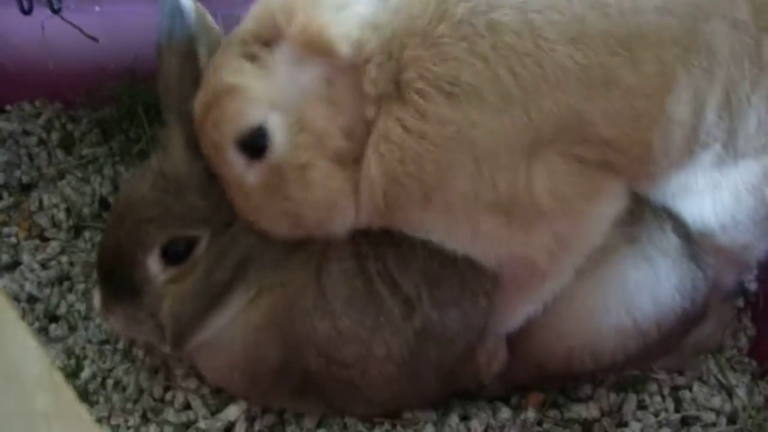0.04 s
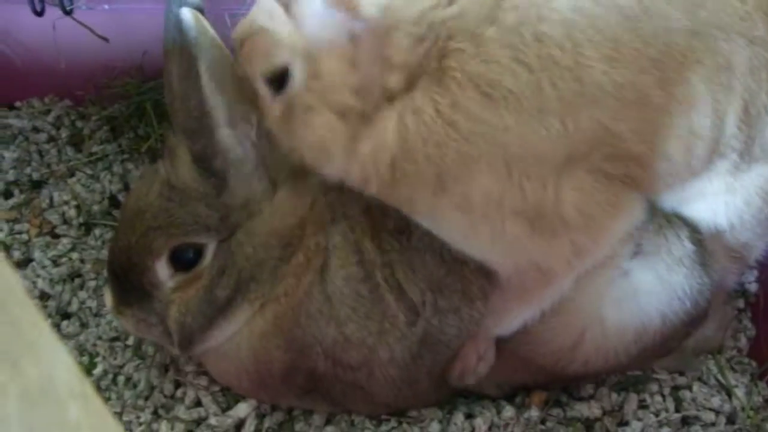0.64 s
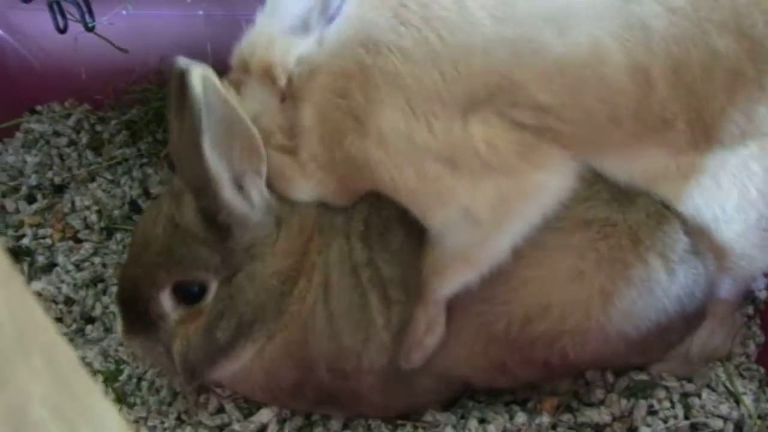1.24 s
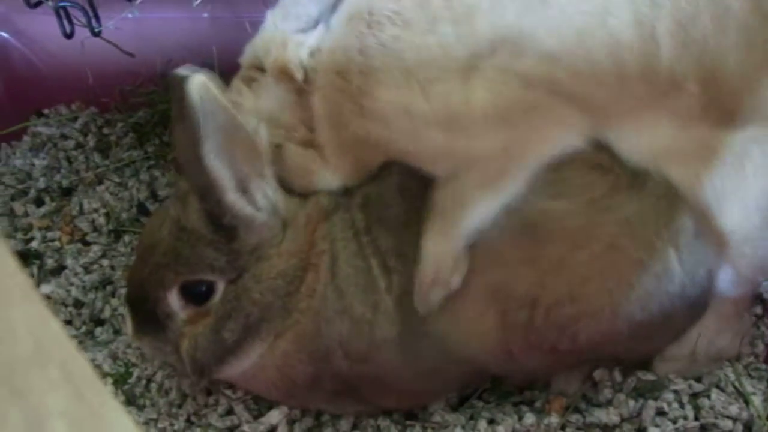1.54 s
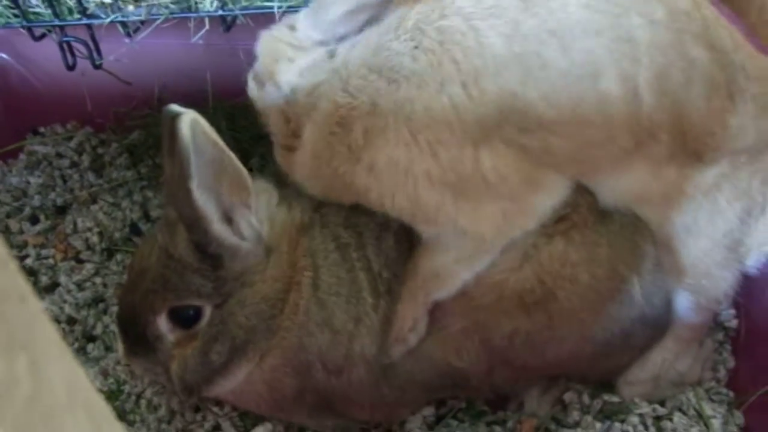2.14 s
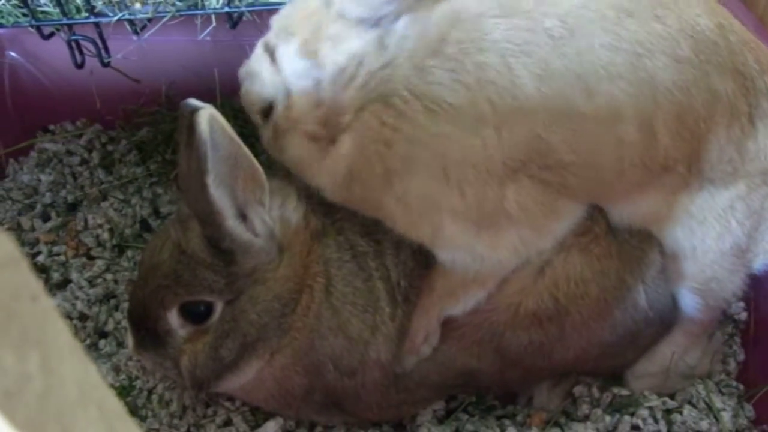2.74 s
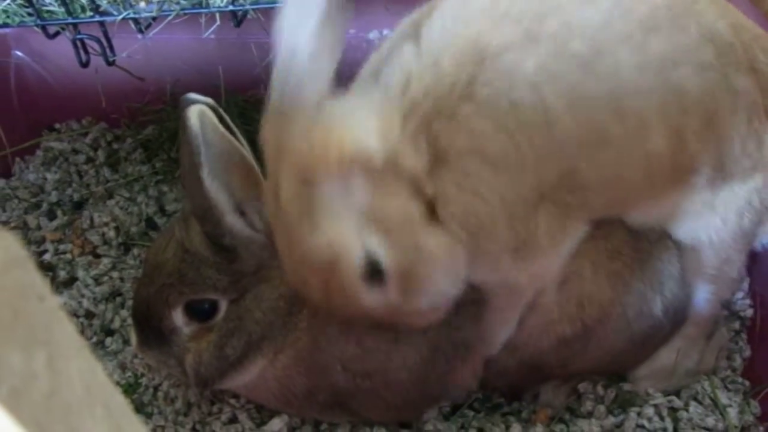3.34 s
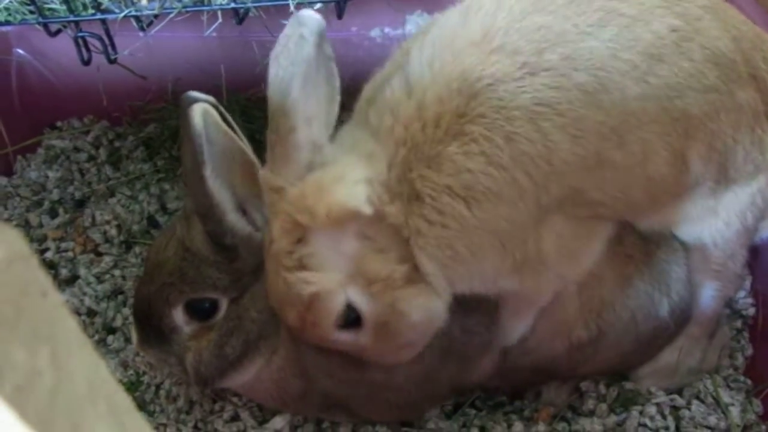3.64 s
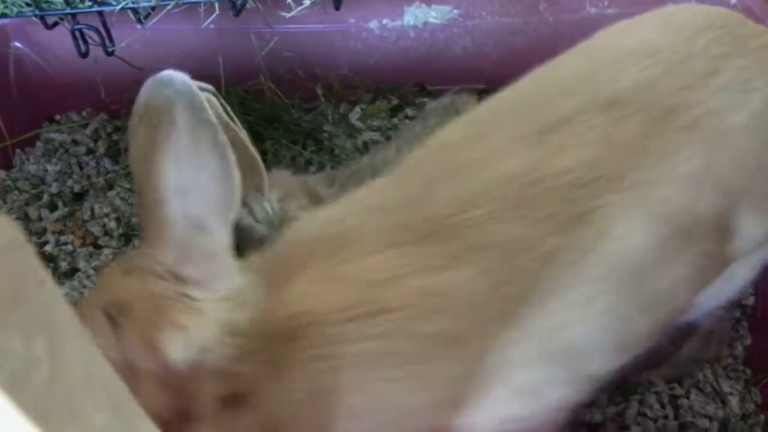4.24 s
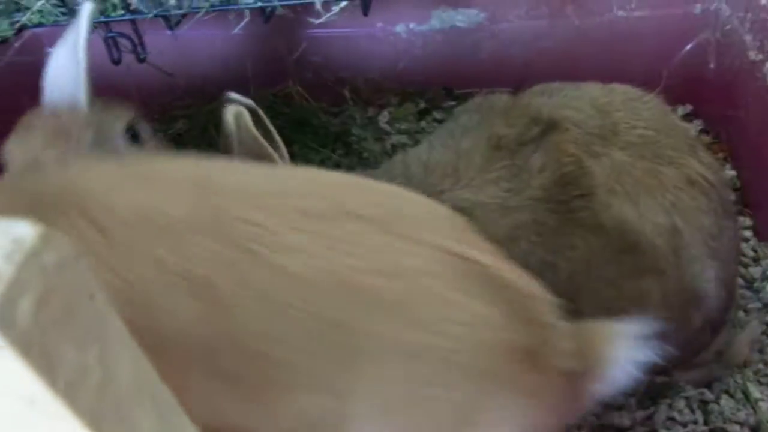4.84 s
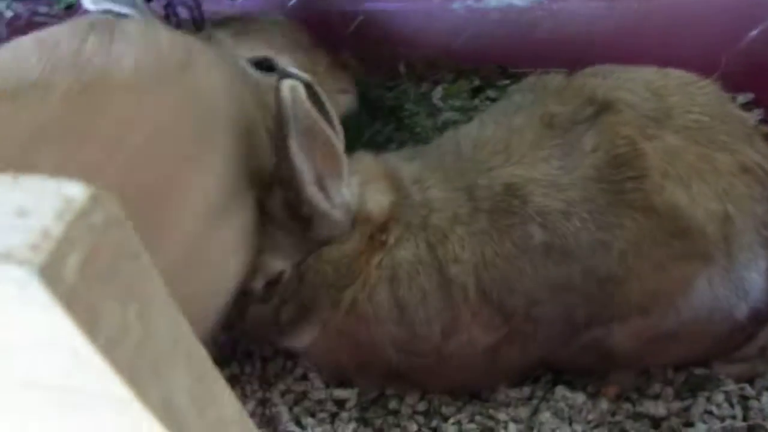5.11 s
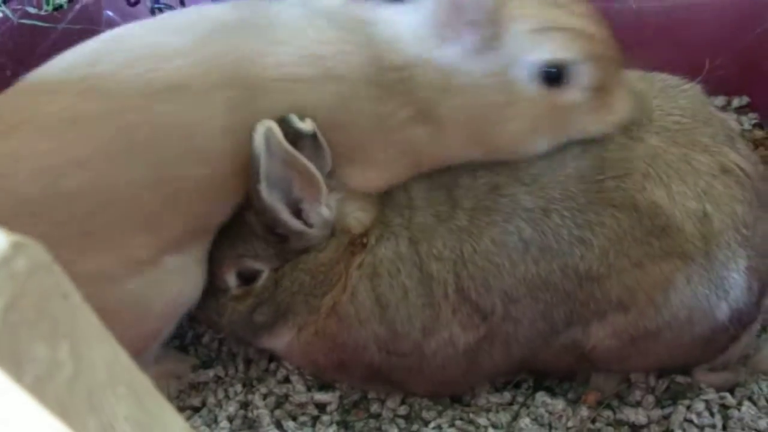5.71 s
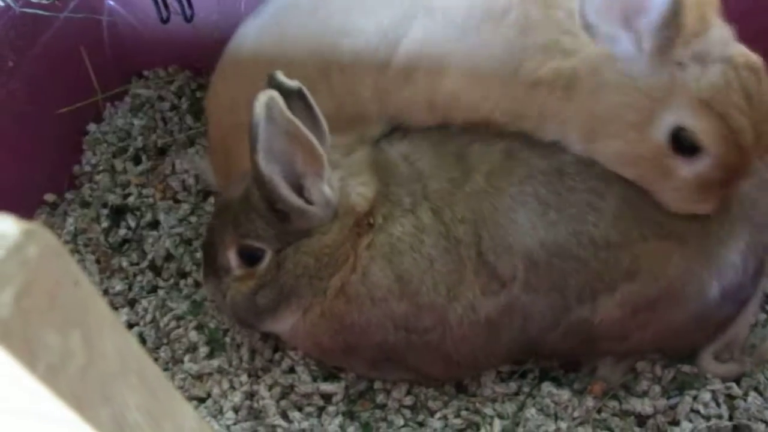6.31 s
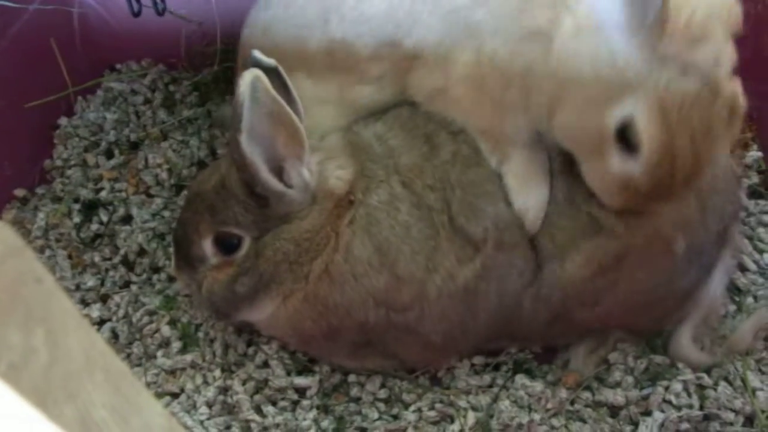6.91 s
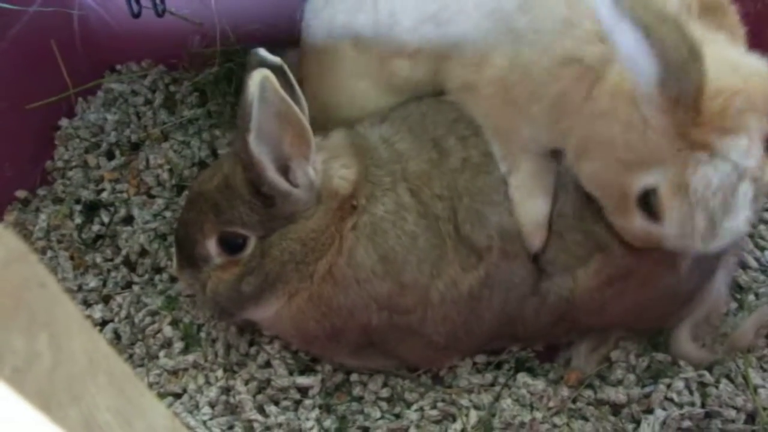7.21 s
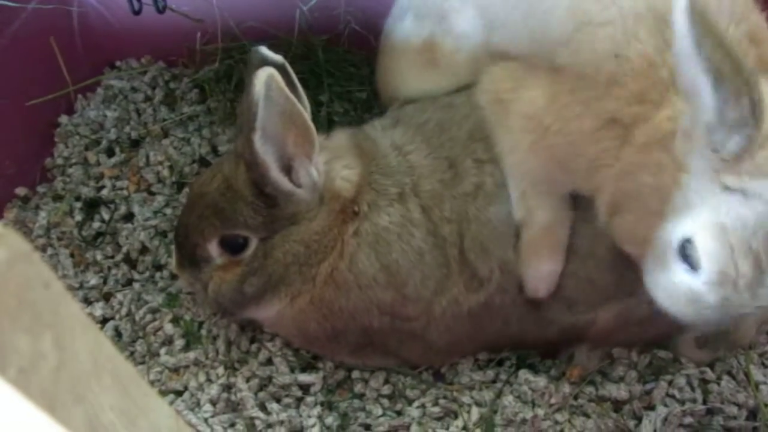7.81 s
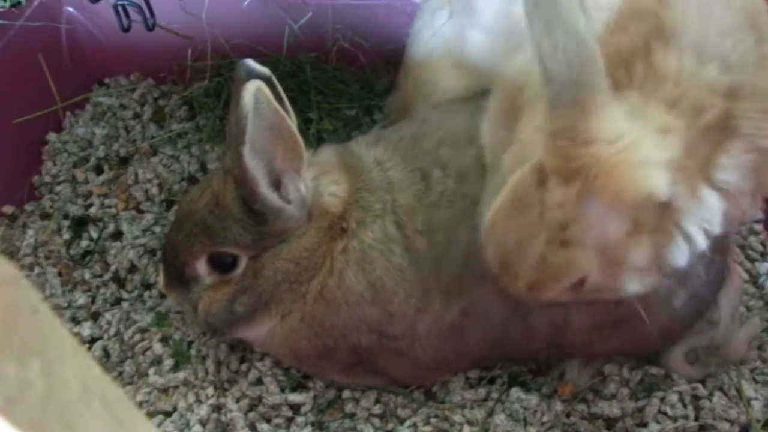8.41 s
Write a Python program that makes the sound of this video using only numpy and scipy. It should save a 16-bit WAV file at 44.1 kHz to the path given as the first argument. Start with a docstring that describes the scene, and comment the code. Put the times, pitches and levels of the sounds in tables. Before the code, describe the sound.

Two rabbits scuffle quietly in a plastic cage tray of pellet litter, close to the microphone. Faint room noise, a low hum and a thin electronic whine run throughout. At about 0.9 seconds the tray knocks against something hard. From 1.3 to 1.6 seconds a quick flurry of soft, hollow thumps makes its floor ring briefly. A lull follows, broken by a second knock at 3 seconds. From 3.9 seconds light, uneven paw steps crunch through the pellets, with hissy fur brushes and a soft rumble of shifting weight. Something small snaps sharply at 5.1 seconds. Claws and loose pellets click in a cluster around 5.9 seconds, followed by a firmer thump just after 6. Fur rustles in short swells from 6.4 to 7.7 seconds, with gentle thumps and crunches near 7.1 and 7.4. Then only the room remains until about 8.5 seconds.

```python
"""Two rabbits scuffle in pellet litter in a plastic cage tray, in a quiet room, near a mono microphone. Their
weight thumps the tray floor and rings its modes. Pellets crunch under paws and fur brushes over fur and litter,
both as trains of tiny slips. Pellets click, the tray knocks twice against something hard, and once something
snaps sharply close by. Under it lie room noise, a faint mains hum and a thin electronic whine."""
import sys
import numpy as np
from scipy import signal
from scipy.fft import rfft, irfft
from scipy.io import wavfile
from scipy.ndimage import uniform_filter1d

SR = 44100
rng = np.random.default_rng(int(sys.argv[2]) if len(sys.argv) > 2 else 0)


def transcribe(signal):
    """Save signal, clipped to [-1, 1], as a 16-bit WAV file at the path in sys.argv[1]."""
    frames = np.atleast_2d(signal).T
    limited = np.clip(frames, -1, 1)
    pcm = np.round(limited * 32767).astype(np.int16)
    wavfile.write(sys.argv[1], SR, pcm)


N = 377496


def amp(db):
    return 10 ** (np.asarray(db) / 20)


def unit_rms(x):
    return x / np.sqrt(np.mean(x ** 2) + 1e-20)


def seconds(count):
    return np.arange(count) / SR


def curve_at(points, hz):
    """Interpolates (Hz, value) points on a log-frequency axis."""
    point_hz, value = np.transpose(points)
    return np.interp(np.log(hz + 1), np.log(point_hz + 1), value)


def add(mix, start_s, sound):
    part = mix[round(start_s * SR):][:len(sound)]
    part += sound[:len(part)]


def colour(x, spectrum):
    """Filters x by (Hz, dB) points; rms 1."""
    gain = amp(curve_at(spectrum, np.fft.rfftfreq(len(x), 1 / SR)))
    return unit_rms(irfft(rfft(x) * gain, len(x)))


def minimum_phase(gain_db, size=2048):
    """Impulse response for a gain curve; energy 1."""
    log_gain = np.log(amp(np.r_[gain_db, gain_db[-2:0:-1]]))
    response = np.fft.ifft(np.exp(np.conj(signal.hilbert(log_gain)))).real[:size]
    return response / np.linalg.norm(response)


def resonance(hz, centre_hz, width_hz):
    return 1 / (1 + (2 * (hz - centre_hz) / width_hz) ** 2)


def ring(modes, t):
    return sum(amp(db - 60 * t / t60) * np.sin(2 * np.pi * hz * t) for hz, db, t60 in modes)


def slip_train(count, per_s, spread_db):
    """Random impulses of uneven size; rms 1."""
    sizes = amp(spread_db * np.minimum(rng.exponential(1, count), 4)) * rng.choice([-1, 1], count)
    return unit_rms(sizes * (rng.random(count) < per_s / SR))


def smooth_noise(first_samples, second_samples):
    """Twice-averaged noise; rms 1."""
    averaged = uniform_filter1d(rng.standard_normal(N), first_samples)
    return unit_rms(uniform_filter1d(averaged, second_samples))


# Noise floor spectrum. Each row: frequency in Hz, relative level in dB.
NOISE_SPECTRUM = [(12, -54), (20, -10), (122, -2), (153, -2), (176, -5.5), (343, -7), (405, -9), (521, -9),
                  (651, -10), (885, -11.5), (1110, -13.5), (1930, -15), (2770, -17.5), (11800, -20),
                  (15600, -22)]
# Hum, then two whine tones. Each row: frequency in Hz, nominal rms level in dB.
HUM_AND_WHINE = [(149.8, -68), (11600.6, -75), (15526.7, -81)]
def background(noise_db=-55.5, waver_db=2):
    """Steady room noise and microphone hiss, wavering mains hum, steady electronic whine."""
    t = seconds(N)
    hum, *whine = [np.sqrt(2) * amp(db) * np.sin(2 * np.pi * (hz * t + rng.random()))
                   for hz, db in HUM_AND_WHINE]
    hum *= amp(waver_db * smooth_noise(6000, 4000))
    noise = amp(noise_db) * colour(rng.standard_normal(N), NOISE_SPECTRUM)
    return noise + hum + sum(whine)


# Tray wall resonances. Each row: centre in Hz, width in Hz, boost in dB.
WALL_RESONANCES = [(540, 127, 9), (925, 290, 4.5), (1370, 93, 5), (2310, 290, 2.5)]
def through_wall_db(spectrum, hz):
    """A contact spectrum plus the resonances of the plastic wall."""
    wall_db = sum(db * resonance(hz, centre, width) for centre, width, db in WALL_RESONANCES)
    return curve_at(spectrum, hz) + wall_db


def contacts(rows, spectrum, slips_per_s, spread_db, attack_power, spot_db, spot_width_ratio):
    """Each contact sets off a swell of slips in the tray; each spot favours its own pitch."""
    out, t, hz = np.zeros(N), seconds(8192), np.fft.rfftfreq(4096, 1 / SR)
    body_db = through_wall_db(spectrum, hz)
    octaves = np.log2(np.maximum(hz, 500) / 500)
    for start_s, db, decay_s, db_per_octave, spot_hz, *_ in rows:
        press = (t / decay_s) ** attack_power * np.exp(-t / decay_s)
        slips = slip_train(len(t), slips_per_s, spread_db) * press
        slips *= np.linalg.norm(press) / (np.linalg.norm(slips) * press.max())
        spot = resonance(hz, spot_hz, spot_width_ratio * spot_hz)
        response = minimum_phase(body_db + db_per_octave * octaves + spot_db * spot)
        add(out, start_s, amp(db) * signal.fftconvolve(slips, response))
    return out


# Tray knocks. Each row: start in seconds, level in dB, decay in seconds, treble slope in dB/octave,
# spot pitch in Hz, delay until the tray drops back in seconds.
TRAY_KNOCKS = [(0.935, -37, 0.0031, -1, 566, 0.0486), (2.9853, -35.5, 0.0029, 0, 820, 0.049)]
# Hard contact spectrum. Each row: frequency in Hz, relative level in dB.
KNOCK_SPECTRUM = [(150, 3), (350, 2), (550, -6.5), (900, -8.5), (1500, -1), (2100, -3), (2700, -2),
                  (4000, -7), (6500, -15), (10000, -10.5), (15500, -24)]
def knocks():
    """The tray hits something hard: a short, dense burst of slips."""
    return contacts(TRAY_KNOCKS, KNOCK_SPECTRUM, slips_per_s=13000, spread_db=6.5,
                    attack_power=0.54, spot_db=8.5, spot_width_ratio=0.37)


# Weight landing on the tray. Each row: centre time in seconds, relative level in dB,
# push pitch in Hz, coupling through the litter to the floor in dB.
BODY_LANDINGS = [(1.349, -30.5, 89.5, -4), (1.358, -27.5, 167, -11), (1.393, -26.5, 187, -0.5),
                 (1.429, -37, 210, 0), (1.462, -34.5, 205, 1.5), (1.497, -38.5, 100.6, 4),
                 (1.538, -28.5, 190, -2), (1.606, -33.5, 200, 4), (4.636, -40, 219, 0),
                 (5.132, -43, 188.5, 0), (6.056, -24.5, 216, -11), (7.125, -41, 150.4, -4.5),
                 (7.413, -40, 152.5, -2.5)]
def landings(rock_db=-36.5, tilt_lag_s=0.0114, tilt_hz=100, drop_hz=131):
    """Rows for all pushes on the floor: the rabbits, plus the tray's tilt and drop after each knock."""
    tilts = [(s + tilt_lag_s, rock_db, tilt_hz, 0) for s, *_ in TRAY_KNOCKS]
    drops = [(s + drop_s, rock_db, drop_hz, 0) for s, *_, drop_s in TRAY_KNOCKS]
    return BODY_LANDINGS + tilts + drops


# Tray floor modes. Each row: frequency in Hz, relative level in dB, T60 in seconds.
FLOOR_MODES = [(49.8, -9, 0.29), (96.4, -10.5, 0.35), (118, -21, .2), (145, -11, 0.16), (174, -20, 0.19),
               (205, -7.5, 0.13), (233, -3.5, 0.13), (313, -9, 0.089), (400, -10, 0.17), (524, -14, .2)]
def thumps(ring_db=10, push_width_rad=2.95, rebound_s=0.00985, rebound_db=-11.5, band_hz=(30, 500)):
    """Each landing pushes the floor down and back and bounces once; the floor rings on."""
    pushes, drive, t = np.zeros(N), np.zeros(N), seconds(2048)
    middle_s = t.mean()
    for s, db, hz, coupling_db in landings():
        phase = 2 * np.pi * hz * (t - middle_s)
        push = amp(db) * np.sin(phase) * np.exp(-(phase / push_width_rad) ** 2)
        for delay_s, gain in ((0, 1), (rebound_s, amp(rebound_db))):
            add(pushes, s + delay_s - middle_s, gain * push)
            add(drive, s + delay_s - middle_s, gain * amp(coupling_db) * push)
    floor = ring(FLOOR_MODES, seconds(24000))
    floor /= abs(rfft(floor)).max()
    motion = pushes + amp(ring_db) * signal.oaconvolve(drive, floor)[:N]
    # The small tray radiates little deep bass; the litter cushions the top.
    return signal.sosfilt(signal.butter(1, band_hz, "bandpass", fs=SR, output="sos"), motion)


def crushes(lead_s=0.005, share_db=-20, decay_s=0.0093, db_per_octave=-6, spot_hz=370):
    """Contact rows: each landing crushes pellets, a dull crunch in proportion to its weight."""
    return [(s - lead_s, db + share_db, decay_s, db_per_octave, spot_hz) for s, db, *_ in landings()]


# Paws on pellets. Each row: start in seconds, level in dB, decay in seconds,
# treble slope in dB/octave, spot pitch in Hz.
PAW_STEPS = [(1.492, -47, 0.0093, -0.5, 1450), (3.9113, -45.5, 0.0031, 2.5, 1140),
             (4.009, -39.5, 0.0077, -2, 584), (4.617, -38.5, 0.011, -1, 886), (4.920, -41, 0.0074, 0, 590),
             (4.942, -45.5, 0.0078, 2.5, 2400), (5.675, -50.5, 0.026, 3.5, 695),
             (5.87, -49, 0.017, 9.5, 1720), (6.047, -40, 0.0093, 2.5, 1000), (6.589, -53, 0.023, 0.5, 980),
             (7.009, -49.5, 0.012, 0, 990), (7.098, -52, 0.011, -3, 970), (7.367, -42.5, .012, -1.5, 1300),
             (7.383, -45, 0.019, -10, 404)]
# Pellet crunch spectrum. Each row: frequency in Hz, relative level in dB.
PELLET_SPECTRUM = [(90, -29), (200, 2.5), (500, 1.5), (1000, -5), (2200, -6.5), (4000, -13), (6500, -20.5),
                   (10000, -19), (15500, -34)]
def crunches():
    """Paws and landings press pellets against the plastic."""
    return contacts(PAW_STEPS + crushes() + walk(), PELLET_SPECTRUM, slips_per_s=9000, spread_db=2.5,
                    attack_power=0.42, spot_db=10.5, spot_width_ratio=0.18)


# Fur strokes. Each row: fastest moment in seconds, relative level in dB, half length in seconds.
FUR_STROKES = [(3.993, -57.5, .045), (4.75, -57, .03), (4.939, -50.5, 0.014), (5.166, -60, 0.04),
               (5.39, -60, 0.03), (5.686, -62.5, 0.057), (5.865, -58, .04), (5.939, -48, 0.009),
               (6.059, -45.5, 0.012), (6.44, -57.5, .035), (6.659, -49.5, 0.033), (7.073, -54.5, .055),
               (7.104, -46.5, 0.009), (7.304, -55.5, .035), (7.382, -52.5, 0.034), (7.667, -60, .042)]
def slide_speed(rest_db=-72, peakedness=1.4, ruffle_db=-62, ruffle_lag_s=0.019, ruffle_half_s=0.032):
    """Envelope of body movement: a swell per stroke and per landing; slower pushes ruffle more."""
    t = seconds(N)[::32]
    ruffles = [(s + ruffle_lag_s, ruffle_db - 9 * np.log2(hz / 100), ruffle_half_s)
               for s, _, hz, _ in landings()]
    power = sum(amp(db) ** 2 * np.exp(-abs((t - s) / half_s) ** peakedness)
                for s, db, half_s in FUR_STROKES + ruffles)
    return amp(rest_db) + np.interp(seconds(N), t, np.sqrt(power))


# Fur hiss spectrum. Each row: frequency in Hz, relative level in dB.
FUR_SPECTRUM = [(200, 1.5), (600, -8.5), (2000, -10.5), (4000, -14.5), (6300, -9.5), (8000, -3.5),
                (9700, 3.5), (11500, -3), (13500, -8.5), (15500, -25)]
def fur(slips_per_s=9000, spread_db=4.0, clump_db=3.0):
    """Hairs slip in dense clumps: a fine hiss that follows the movement."""
    clumps = amp(clump_db * smooth_noise(400, 200))
    return slide_speed() * colour(slip_train(N, slips_per_s, spread_db) * clumps, FUR_SPECTRUM)


def drag(gain_db=-4, slips_per_s=3000, spread_db=2.5):
    """Sliding bodies drag pellets along the plastic."""
    response = minimum_phase(through_wall_db(PELLET_SPECTRUM, np.fft.rfftfreq(4096, 1 / SR)))
    slips = slide_speed() * slip_train(N, slips_per_s, spread_db)
    return amp(gain_db) * signal.oaconvolve(slips, response)[:N]


# Spectrum of weight shifting on litter. Each row: frequency in Hz, relative level in dB.
SETTLING_SPECTRUM = [(60, -34), (115, 2.5), (150, 4), (230, -3), (330, -12.5), (600, -17), (1200, -25.5),
                     (3000, -54)]
def settling(slide_db=-1, lag_s=0.018, shifts_per_s=500, spread_db=2, landing_db=-22, decay_s=0.21):
    """Weight settles in the litter after each movement and landing: a soft rumble."""
    t = seconds(N)
    sliding = np.interp(t - lag_s, t, uniform_filter1d(slide_speed(), size=3000))
    landing_power = sum((t > s) * (amp(db + coupling_db) * np.exp(-abs(t - s) / decay_s)) ** 2
                        for s, db, _, coupling_db in landings())
    envelope = amp(slide_db) * sliding + amp(landing_db) * np.sqrt(landing_power)
    return envelope * colour(slip_train(N, shifts_per_s, spread_db), SETTLING_SPECTRUM)


def walk(start_s=3.9, end_s=5.6, count=14, level_db=-57, spread_db=2.0, decay_s=0.019,
         db_per_octave=1.7, spot_hz=650):
    """Contact rows: one rabbit climbs off and pads round the other with light, uneven steps."""
    late, force, spot = rng.random((count, 3)).T
    times = start_s + (np.arange(count) + late) / count * (end_s - start_s)
    levels = level_db + spread_db * (2 * force - 1)
    pitches = spot_hz * 2 ** (spot - 0.5)
    return [(s, db, decay_s, db_per_octave, hz) for s, db, hz in zip(times, levels, pitches)]


def loose_pellets(count=14, peak_db=-42, spread_db=3, pitch_hz=9500, spread_oct=0.27, decay_s=0.0015):
    """Click rows: pellets click at random, most often where the movement is fastest."""
    when, force, pitch = rng.random((count, 3)).T
    odds = np.cumsum(slide_speed() ** 2)
    times = np.searchsorted(odds, when * odds[-1]) / SR
    peaks = peak_db + spread_db * (2 * force - 1)
    pitches = pitch_hz * 2 ** (spread_oct * (2 * pitch - 1))
    return [(s, db, hz, decay_s) for s, db, hz in zip(times, peaks, pitches)]


# Louder pellet clicks. Each row: start in seconds, peak in dB, pitch in Hz, scratch decay in seconds.
PELLET_CLICKS = [(4.724, -37.5, 9300, .006), (4.929, -40, 5060, .004), (5.138, -35, 9500, .002),
                 (5.836, -40, 4200, .001), (5.890, -32, 2200, 0.00099), (5.904, -28, 7300, 0.00098),
                 (5.942, -29.5, 11500, 0.0016), (7.355, -34, 5600, 0.0024)]
def clicks(width_hz=850):
    """Pellets click, the louder ones placed and fainter ones at random: a small impact and a very short scratch
    ring one resonance."""
    out, t = np.zeros(N), seconds(900)
    for start_s, peak_db, hz, decay_s in PELLET_CLICKS + loose_pellets():
        scratch = rng.standard_normal(len(t)) * np.exp(-t / decay_s)
        scratch[0] += np.linalg.norm(scratch)  # impact
        mode = np.exp(-np.pi * width_hz * t) * np.sin(2 * np.pi * hz * t)
        click = np.convolve(scratch, mode)
        add(out, start_s, amp(peak_db) * click / abs(click).max())
    return out


# Modes of the snapping object. Each row: frequency in Hz, relative level in dB, T60 in seconds.
SNAP_MODES = [(260, -15, 0.0054), (1330, -18.5, 0.005), (1960, -16, 0.0045), (3270, -21, 0.0022),
              (5600, -16.5, 0.0026), (8330, -4.5, 0.0018), (11150, -9, 0.0028), (12900, -13, 0.0028)]
def snap(at_s=5.117, gain_db=2, rise_s=0.00017, spread_s=0.00054, debris_db=-30, debris_s=0.0025):
    """Something small and hard cracks: the low flex comes first, the high modes just after."""
    out, t = np.zeros(N), seconds(2048)
    rise = 1 - np.exp(-t / rise_s)
    delays = np.linspace(-1, 1, len(SNAP_MODES)) * spread_s / 2
    for mode, delay_s in zip(SNAP_MODES, delays):
        add(out, at_s + delay_s, amp(gain_db) * ring([mode], t) * rise)
    debris = colour(rng.standard_normal(len(t)), KNOCK_SPECTRUM) * np.exp(-t / debris_s)
    add(out, at_s, amp(debris_db) * debris)
    return out


# Room decay. Each row: frequency in Hz, T60 in seconds.
ROOM_DECAY = [(100, 0.77), (250, 0.2), (1000, 0.42), (10000, 0.18)]
def room(x, build_s=0.011):
    """Diffuse reflections: a noise tail in which the bass lasts longest."""
    hz, t, bands = signal.stft(rng.standard_normal(SR), SR, nperseg=256)
    decay = amp(-60 * t / curve_at(ROOM_DECAY, hz)[:, None])
    _, tail = signal.istft(bands * decay, SR, nperseg=256)
    tail *= np.minimum(seconds(len(tail)) / build_s, 1)
    return signal.oaconvolve(x, tail / np.linalg.norm(tail))[:N]


def scene(low_send_db=-13, litter_send_db=-16, snap_send_db=-30):
    """All sources and their reflections, the same in both channels."""
    crunching, knocking = crunches(), knocks()
    low = thumps() + settling()
    litter = crunching + knocking + drag() + fur() + clicks()
    crack = snap()
    send = amp(low_send_db) * low + amp(litter_send_db) * litter + amp(snap_send_db) * crack
    return np.tile(low + litter + crack + room(send) + background(), (2, 1))


def record(dry, low_cut_hz=28, high_cut_hz=15850):
    """Microphone bass roll-off, then a steep band limit."""
    highpass = signal.butter(2, low_cut_hz, "highpass", fs=SR, output="sos")
    lowpass = signal.firwin(511, high_cut_hz, window=("kaiser", 9), fs=SR)
    return signal.oaconvolve(signal.sosfilt(highpass, dry), lowpass[None], "same")


dry = scene()
out = record(dry)
transcribe(out)
```